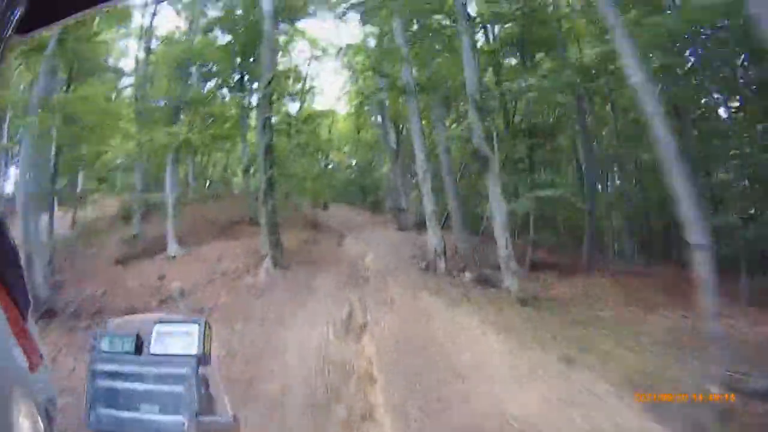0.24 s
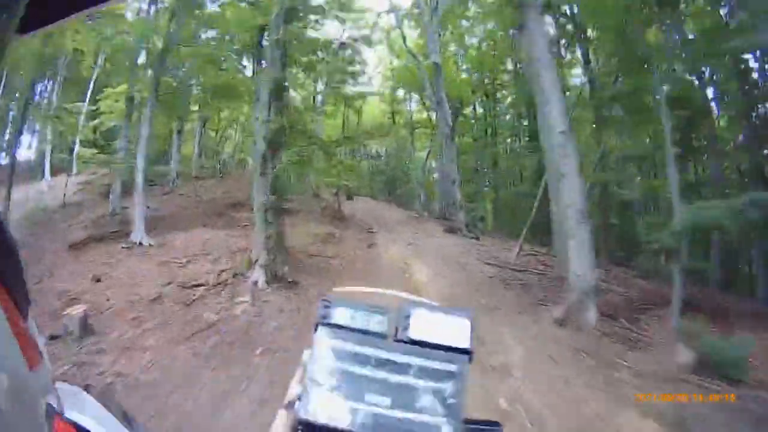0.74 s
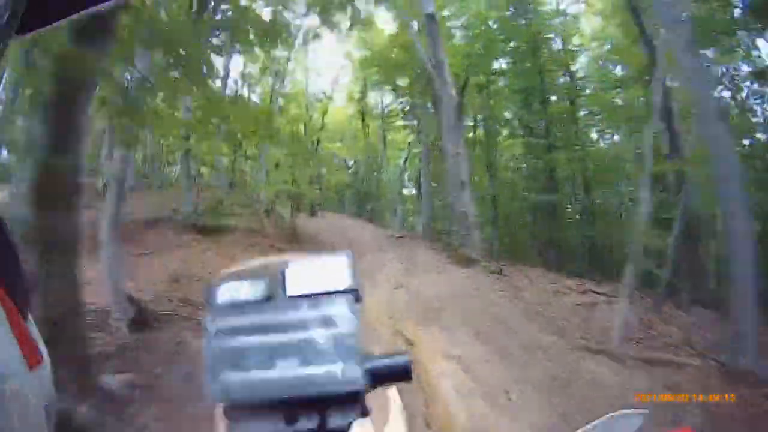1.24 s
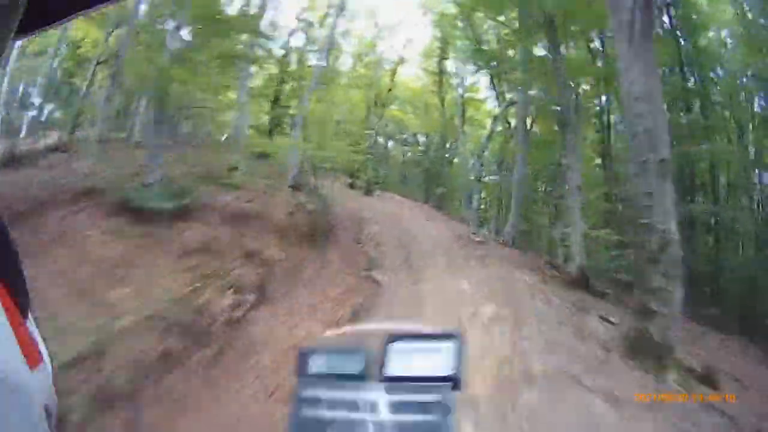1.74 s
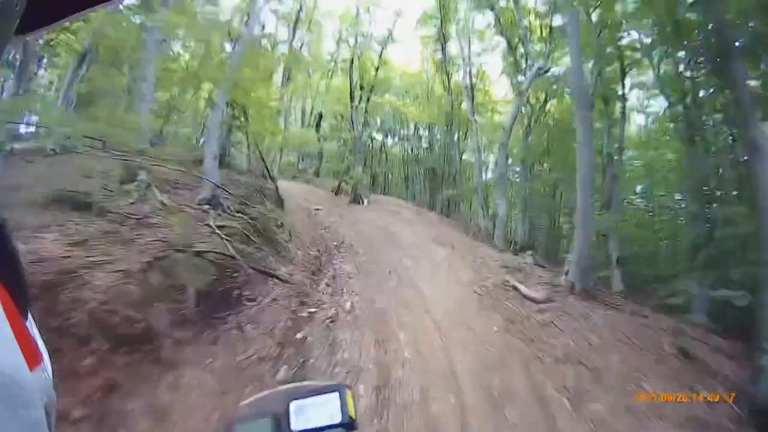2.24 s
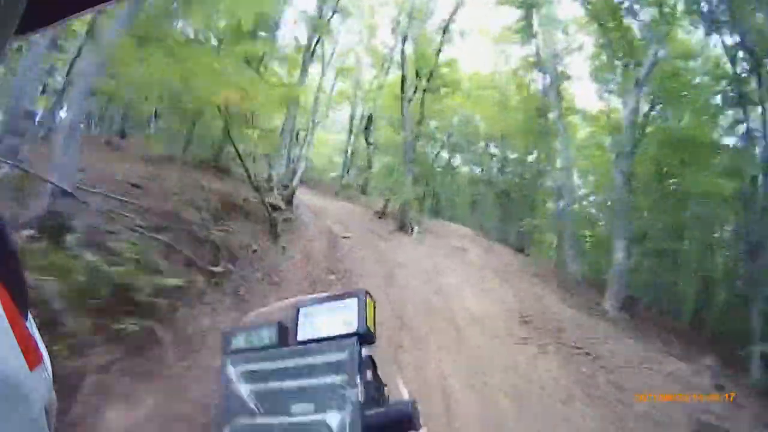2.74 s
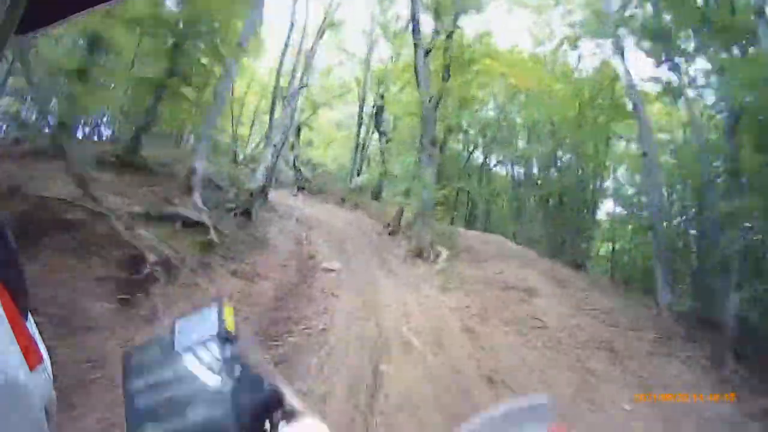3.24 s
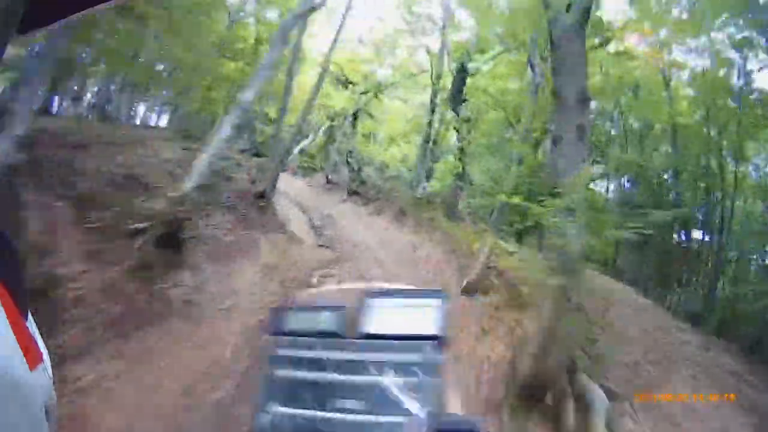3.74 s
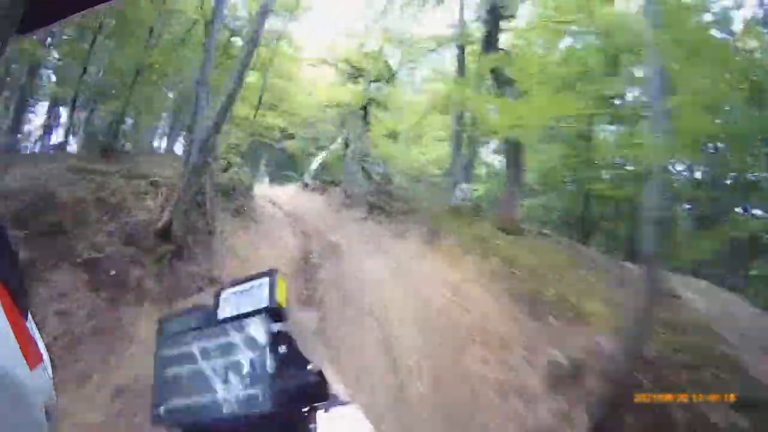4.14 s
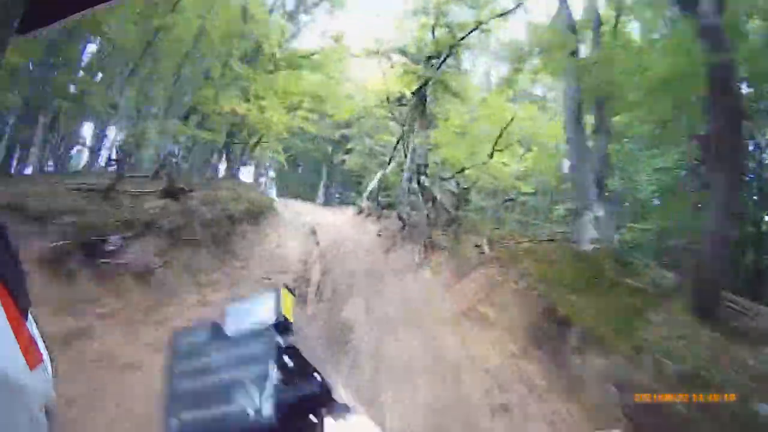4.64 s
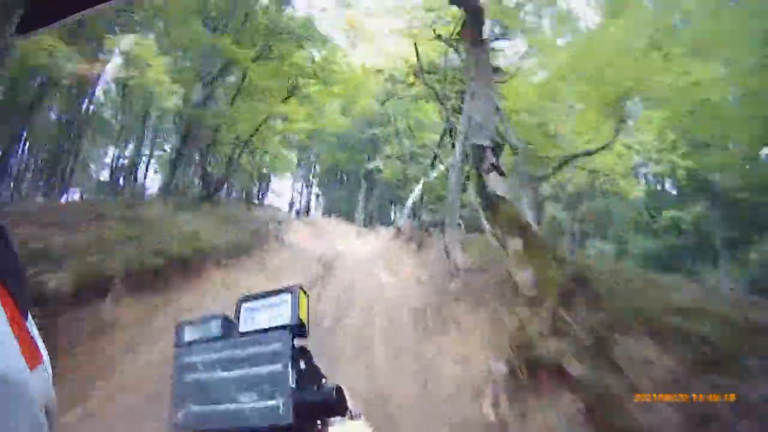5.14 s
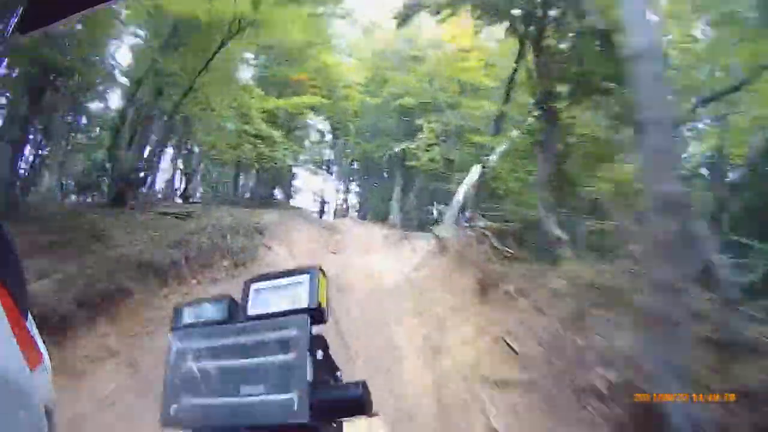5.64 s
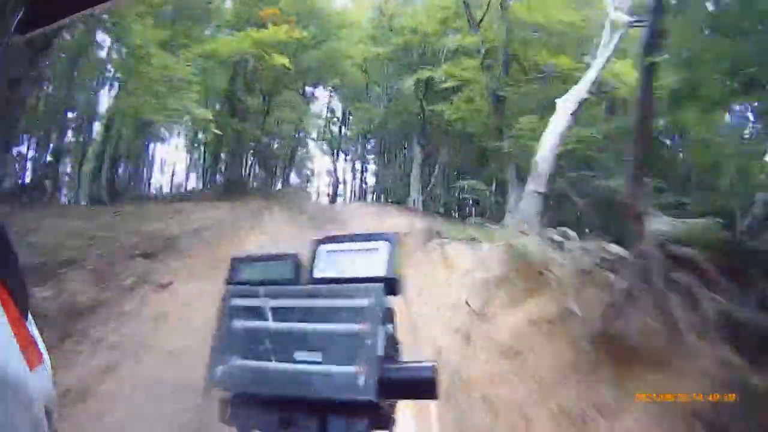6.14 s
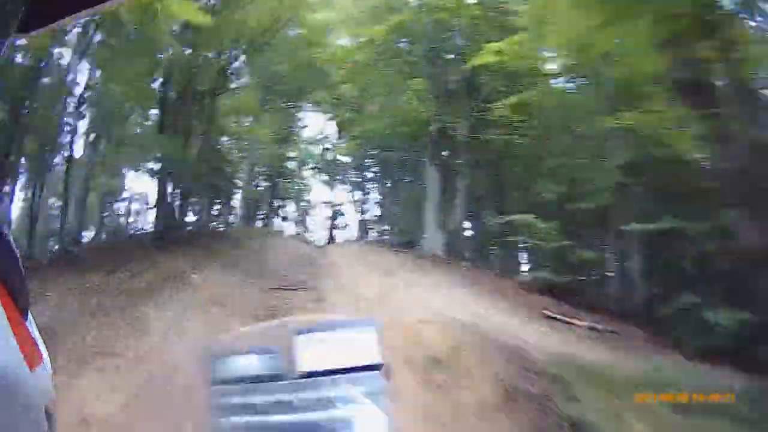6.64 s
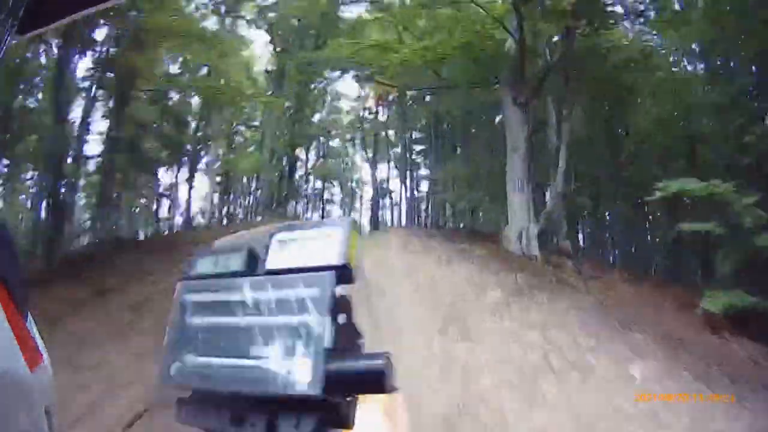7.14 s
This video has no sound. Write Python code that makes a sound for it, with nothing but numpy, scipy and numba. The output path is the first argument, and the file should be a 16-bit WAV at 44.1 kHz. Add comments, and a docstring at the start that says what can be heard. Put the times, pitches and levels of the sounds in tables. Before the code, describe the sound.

A single-cylinder dirt bike climbs a rough forest trail, heard close up from the rider's helmet. Its throbbing, wavering growl dominates throughout, with light engine clatter, faint tyre hiss and a low wind rumble beneath. The revs build over the first two seconds, then the throttle shuts and the engine turns much quieter. From about 2.8 seconds it pulls unevenly at lower revs, grows louder around 4.7 seconds and reaches its highest pitch near 6 seconds. It drops sharply at about 6.3 seconds, then picks up again from 6.5 seconds to the end. Short, dull knocks from bumps come at around 0.5, 3 and 3.8 seconds, and a few more between 6.4 and 7 seconds. Brief, light metallic rattles of chain and loose parts are scattered along the way, clearest near 1.5 and 5.6 seconds.

```python
"""Dirt bike on a forest trail

A four-stroke single climbs rough ground, heard close up from a microphone on the rider's helmet.
Each cycle gives an exhaust blow and, with the throttle open, an intake gulp; both ring pipe and airbox.
The engine case clatters, chain and tyres hiss, the brake disc brushes its pads, stones tick,
bumps rattle and jolt the bike, and air rumbles at the microphone."""
import sys
import numpy as np
from scipy import signal
from scipy.fft import rfft, irfft, next_fast_len
from scipy.io import wavfile
from scipy.ndimage import uniform_filter1d
from numba import njit

SR = 44100
rng = np.random.default_rng(int(sys.argv[2]) if len(sys.argv) > 2 else 0)


def dump(signal):
    """Clip the signal to [-1, 1] and save it as 16-bit WAV at the path in sys.argv[1]."""
    limited = np.clip(np.atleast_2d(signal).T, -1, 1)
    pcm = np.round(limited * 32767).astype(np.int16)
    wavfile.write(sys.argv[1], SR, pcm)


N = 326340
TIME = np.arange(N) / SR
CRUISE_HZ, CRUISE_DB = 38, -15  # firing rate and load at a steady pull

# engine speed: t/s, firing rate/Hz
SPEED = [(0.0, 32.77), (0.06, 33.02), (0.14, 34.61), (0.41, 34.67), (0.73, 37.07), (0.83, 36.4),
         (1.22, 41.86), (1.37, 39.5), (1.46, 40.57), (1.54, 43.89), (1.62, 40.79), (1.71, 40.04),
         (1.79, 40.91), (1.88, 41.69), (1.98, 42.72), (2.05, 33.76), (2.24, 37.19), (2.42, 36.05),
         (2.62, 35.81), (2.76, 33.5), (2.83, 34.3), (3.01, 38.31), (3.09, 37.82), (3.17, 38.95),
         (3.52, 34.14), (3.77, 33.47), (3.91, 35.02), (4.01, 35.48), (4.08, 33.79), (4.26, 36.24),
         (4.39, 34.76), (4.48, 34.83), (4.58, 36.38), (4.74, 34.93), (4.92, 35.86), (5.04, 38.99),
         (5.28, 37.89), (5.41, 35.12), (5.45, 36.15), (5.52, 39.04), (5.63, 38.76), (5.84, 44.53),
         (5.93, 44.96), (5.98, 48.16), (6.01, 48.39), (6.1, 48.79), (6.17, 48.18), (6.24, 43.52),
         (6.31, 37.13), (6.41, 33.93), (6.44, 36.13), (6.55, 37.53), (6.67, 35.59), (6.83, 41.27),
         (6.91, 40.56), (6.98, 42.65), (7.04, 41.57), (7.22, 41.84), (7.31, 44.55), (7.39, 44.58)]
# how hard the engine pulls: t/s, level/dB
LOAD = [(0.0, -16), (0.5, -18), (0.9, -13.5), (1.2, -13.5), (1.54, -13.5), (1.6, -14.5), (1.95, -13),
        (2.06, -27.5), (2.15, -32.5), (2.24, -23), (2.42, -25), (2.79, -23.5), (2.86, -17), (3.0, -19.5),
        (3.11, -21.5), (3.18, -17.5), (3.33, -18.5), (3.54, -25), (3.8, -21.5), (4.04, -17.5), (4.6, -17.5),
        (4.73, -12), (5.03, -13.5), (5.24, -14.5), (5.62, -13), (5.8, -9), (5.96, -9.5), (6.1, -12.5),
        (6.17, -10.5), (6.255, -10.5), (6.275, -21.5), (6.33, -20), (6.4, -26), (6.5, -16.5), (6.65, -20),
        (6.9, -13), (7.4, -10.5)]
# trims on top of load and speed: t/s, bark/dB, case clatter/dB, hiss/dB
TRIMS = [(0.0, 2.5, -0.5, 1), (0.8, 0, -0.5, 1.5), (1.0, 2, -2, 0), (1.6, 3, -0.5, 2.5),
         (1.7, 3.5, -3, 0.5), (2.1, 3.5, 1.5, 2.5), (2.2, 1.8, -0.5, -1.5), (3.2, 1, -2, -1),
         (3.3, 2, 3.5, 0.5), (3.5, 1, -1, 3), (3.7, 0, 0.4, -0.2), (4.2, 3, 2, 2), (4.9, -0.5, -0.5, 0),
         (5.0, 3.5, -0.5, 1.5), (5.4, 2.5, 1.5, 2.5), (5.5, 6, 0.1, 1.5), (5.6, 1, 1.5, 0.5),
         (6.2, 0.5, 2, 1.5), (6.3, 3.5, 0.5, 3), (6.8, 3, -2.5, 1), (6.9, 1.5, 0.1, 1.5), (7.4, 2, 1, 1)]
# colour of chain and loose parts: f/Hz, level/dB
RATTLE_COLOUR = [(600, -17), (1200, 20), (2500, 4), (4000, 1), (5500, -0.5), (7800, -6), (10000, -18.5),
                 (16000, -26.5)]


def undb(db):
    """Decibels to gain."""
    return 10 ** (np.asarray(db) / 20)


def curves(table):
    """The columns of a table, joined by straight lines in time."""
    s, *columns = np.transpose(table)
    return [np.interp(TIME, s, c) for c in columns]


def unit(x):
    """Scale to rms 1."""
    return x / np.sqrt(np.mean(x ** 2))


def steady(x):
    """Scale to rms 1 over a few engine cycles, keeping the single beats."""
    size = SR // 9
    return x / np.sqrt(uniform_filter1d(uniform_filter1d(x ** 2, size), size // 2) + 1e-18)


def noise():
    """White noise."""
    return rng.standard_normal(N)


def walk(rate):
    """Glide to a new random value every 1 / rate s; rms 1."""
    size = int(SR / rate)
    steps = np.repeat(rng.standard_normal(N // size + 1), size)
    return unit(uniform_filter1d(steps, size)[:N])


def ring(x, colour, sharp=1):
    """Pass x through a body's (Hz, dB) response; sharp 1 strikes and fades, -1 swells and stops."""
    size = next_fast_len(N + SR // 2, True) // 2 * 2
    hz, db = np.transpose(colour)
    freqs = np.arange(size // 2 + 1) * SR / size
    cepstrum = irfft(np.log(undb(np.interp(np.log(freqs + 1), np.log(hz), db))))
    cepstrum[1:size // 2] *= 1 + sharp
    cepstrum[size // 2 + 1:] *= 1 - sharp
    return irfft(rfft(x, size) * np.exp(rfft(cepstrum)))[:N]


@njit
def band(x, hz, width):
    """Band-pass whose centre may move every sample; gain 1 at the centre."""
    out, b, low = np.empty(len(x)), 0., 0.
    for i in range(len(x)):
        g, k = np.tan(np.pi * hz[i] / SR), width / hz[i]
        v = (b + g * (x[i] - low)) / (1 + g * (g + k))
        b, low, out[i] = 2 * v - b, low + 2 * g * v, k * v
    return out


def resonate(x, centres, width_hz, boost_db):
    """Lift a narrow resonance that moves along a (s, Hz) curve."""
    hz, = curves(centres)
    return x + (undb(boost_db) - 1) * band(x, hz, float(width_hz))


def clicks(times, sizes):
    """Impulses, each shared between two neighbouring samples."""
    place = np.clip(times * SR, 0, N)
    at, part = place.astype(int), place % 1
    return (np.bincount(at, sizes * (1 - part), N + 2) + np.bincount(at + 1, sizes * part, N + 2))[:N]


def puffs(pulses, decay_s):
    """A burst of turbulence after each pulse, with the same energy as the pulse."""
    keep = np.exp(-1 / (decay_s * SR))
    return signal.lfilter([np.sqrt(1 - keep ** 2)], [1, -keep], np.abs(pulses)) * noise()


def strokes(cycles, jitter_s, scatter_db):
    """One pulse per engine cycle, never quite alike; jitter and scatter may be curves."""
    times = np.interp(np.arange(np.ceil(cycles[0]), cycles[-1]), cycles, TIME)
    chance = rng.standard_normal((len(times), 2))
    jitter, scatter = (np.interp(times, TIME, c + np.zeros(N)) for c in (jitter_s, scatter_db))
    return clicks(times + jitter * chance[:, 0], undb(scatter * chance[:, 1]))


def crank(rate):
    """Engine cycles so far; now and then the beat shifts a few milliseconds, like an audio glitch."""
    # skips in the sound: t/s, delay of the beat/cycles
    skips = [(1.22, .2), (1.84, -.12), (4.28, .16), (5.69, -.13), (5.95, .12)]
    delay = sum(part * np.clip((TIME - s) / .025 + .5, 0, 1) for s, part in skips)
    return np.cumsum(rate) / SR - delay - .15


def pipe_boom(cycles):
    """Exhaust pushes and intake sucks; their spacing picks which harmonics stand out."""
    # throttle: t/s, intake gulp against exhaust blow/dB, its lag/cycles, unevenness/dB
    throttle = [(0, -5, .572, -17), (.45, -2, .575, -13.5), (1.15, -3.5, .572, -16),
                (1.55, -3.5, .575, -12), (1.9, -10.5, .57, -8), (2.2, -25, .57, -10), (2.7, -22, .57, -10),
                (3.0, -9.5, .66, -11), (3.25, -3, .65, -20), (3.5, -9.5, .62, -12), (3.8, -8, .6, -8.5),
                (4.05, -3.5, .56, -5.5), (4.5, -9.5, .56, -9), (4.8, -4.5, .563, -9.5),
                (5.05, -10, .575, -9.5), (5.2, -11, .59, -6.5), (5.38, -6.5, .565, -18.5),
                (5.6, -6.5, .59, -23.5), (5.85, -2.5, .59, -26.5), (6.08, -16, .55, -10),
                (6.3, -12.5, .576, -13), (6.55, -6, .63, -13.5), (6.85, -11, .6, -9.5),
                (7.1, -8.5, .59, -13), (7.4, -7, .56, -10.5)]
    # low response of pipe and airbox: f/Hz, level/dB
    colour = [(15, -74), (40, -47), (78, -20), (120, -25), (165, -17.5), (205, 1.5), (240, 3), (268, 4),
              (290, 3), (325, 0.5), (375, -15.5), (600, -90)]
    # its wandering resonance: t/s, f/Hz
    resonance = [(0, 299), (.8, 273), (1.6, 268), (2.0, 307), (2.25, 310), (2.7, 298), (2.9, 261),
                 (3.25, 276), (3.45, 308), (3.8, 298), (4.1, 268), (4.9, 279), (5.1, 245), (5.35, 266),
                 (5.55, 232), (6.05, 268), (6.5, 283), (7.0, 283), (7.4, 246)]
    intake_db, intake_lag, uneven_db = curves(throttle)
    # the throttle trembles over rough ground, so the growl wavers
    intake_db += 1.4 * walk(rate=11)
    intake_lag += .008 * walk(rate=14)
    # the blows vary in time and strength, following the unevenness curve
    uneven = undb(uneven_db)
    spread = dict(jitter_s=.0009 * uneven, scatter_db=4.5 * uneven)
    gas = strokes(cycles, **spread) - undb(intake_db) * strokes(cycles - intake_lag, **spread)
    boom = ring(gas + .75 * uneven * puffs(gas, decay_s=.008), colour, sharp=-.4)
    return resonate(boom, resonance, width_hz=108, boost_db=9.5)


def drone(boom, load_db, from_db=-18, full_db=-13):
    """Under load the pipe rings at its limit and the blows merge into a drone."""
    squeeze = np.interp(load_db, [from_db, full_db], [0, .45])
    swing = np.abs(signal.hilbert(steady(boom), next_fast_len(N)))[:N]
    size = SR // 200
    envelope = uniform_filter1d(uniform_filter1d(swing, size), size)
    return steady(boom / (envelope + .1) ** squeeze)


def valve_bark(cycles, exhaust_lag=.2084, intake_lag=.59):
    """Each valve adds a short, bright bark with a spit of turbulence and a longer wake."""
    # balance of the two barks: t/s, intake against exhaust/dB
    balance = [(0, -4), (.45, 11), (.62, -6.5), (1.0, -6), (1.95, 6.5), (2.3, -11), (2.75, 2), (2.85, -4),
               (3.3, -0.5), (3.55, -5.5), (3.95, -7), (5.6, -8), (6.0, -2.5), (6.4, -7.5), (7.4, -2)]
    # midrange response of the pipe: f/Hz, level/dB
    colour = [(230, -19.5), (340, 4), (420, 2.5), (490, -0.5), (550, -0.5), (620, -1.5), (680, -4.5),
              (750, -3.5), (880, -13), (1500, -59), (4000, -100)]
    # its wandering resonance: t/s, f/Hz
    resonance = [(0, 493), (.6, 480), (1.0, 456), (1.5, 486), (1.9, 482), (2.3, 527), (3.0, 513),
                 (4.0, 480), (4.35, 470), (4.8, 504), (5.25, 448), (5.5, 469), (5.9, 449), (6.6, 471),
                 (7.1, 488), (7.4, 495)]
    intake_db, = curves(balance)
    snaps = strokes(cycles - exhaust_lag, jitter_s=.00006, scatter_db=1.2)
    snaps += undb(intake_db) * strokes(cycles - intake_lag, jitter_s=.00006, scatter_db=1.2)
    spit, wake = .2 * puffs(snaps, decay_s=.003), .53 * puffs(snaps, decay_s=.04)
    bark = ring(snaps + spit + wake, colour, sharp=-.05)
    return steady(resonate(bark, resonance, width_hz=60, boost_db=8))


def piston_slaps(cycles):
    """Piston and valves slap twice a cycle, the second blow less regular."""
    first = strokes(cycles - .1, jitter_s=.0003, scatter_db=-.5)
    return first + .93 * strokes(cycles - .75, jitter_s=.00055, scatter_db=3.5)


def case_clatter(slaps):
    """The engine case rings under the slaps."""
    # response of the case: f/Hz, level/dB
    colour = [(500, -28), (880, -4), (1030, -0.5), (1170, -5), (1300, -3), (1480, -8.5), (1750, -10.5),
              (2100, -34), (4000, -62)]
    # its wandering resonance: t/s, f/Hz
    resonance = [(0, 1104), (1.2, 1160), (1.6, 1140), (2.1, 1190), (2.699, 1133), (3.3, 1210), (3.65, 1140),
                 (3.95, 1130), (4.3, 1090), (4.9, 1100), (5.15, 1210), (5.4, 1105), (5.8, 1147),
                 (6.3, 1170), (7.4, 1120)]
    clatter = ring(.4 * slaps + puffs(slaps, decay_s=.014), colour, sharp=.2)
    return steady(resonate(clatter, resonance, width_hz=95, boost_db=9))


def tyre_hiss(slaps):
    """Tyres and grit give a grainy hiss that the engine's blows ride on."""
    # colour of the hiss: f/Hz, level/dB
    colour = [(1000, -4.5), (1800, 0), (2250, 1), (2800, -7), (3550, -9.5), (3730, -6), (3900, -9),
              (4500, -13.5), (5400, -16.5), (7000, -22.5), (9000, -28), (11000, -28.5), (13000, -30.5),
              (16000, -33.5)]
    grit = unit(noise() * undb(2 * np.minimum(rng.exponential(size=N), 5)))
    return steady(ring(grit + .57 * unit(puffs(slaps, decay_s=.01)), colour))


def chain_jingle():
    """The slack chain jingles in fits."""
    return undb(-51 + 2 * walk(rate=25)) * unit(ring(noise(), RATTLE_COLOUR))


def crank_hum(cycles, speed):
    """The unbalanced crank hums at twice the firing rate, more as it speeds up."""
    return undb(-29 + .73 * walk(rate=6)) * speed ** 3.6 * np.sin(4 * np.pi * cycles)


def engine():
    """Engine, chain and tyres all swell with load; clatter, hiss and hum also with speed."""
    (rate,), (load_db,) = curves(SPEED), curves(LOAD)
    bark_db, case_db, hiss_db = curves(TRIMS)
    cycles, speed = crank(rate), rate / CRUISE_HZ
    pull_db, speed_db = load_db - CRUISE_DB, 20 * np.log10(speed)
    boom = undb(.82) * drone(pipe_boom(cycles), load_db)
    bark = undb(-22 + .53 * pull_db + bark_db) * valve_bark(cycles)
    slaps = piston_slaps(cycles)
    clatter = undb(-30 + .31 * pull_db + .55 * speed_db + case_db) * case_clatter(slaps)
    hiss = undb(-41 + .34 * pull_db + speed_db + hiss_db) * tyre_hiss(slaps)
    return undb(load_db) * (boom + chain_jingle() + crank_hum(cycles, speed)) + bark + clatter + hiss


def wind(gust_db=1.5):
    """Air buffets the helmet, right at the microphone."""
    # strength of the wind: t/s, level/dB
    gusts = [(0, -29.5), (1.0, -33), (1.5, -29.5), (2.05, -30.5), (2.15, -31), (2.5, -35.5), (2.65, -28),
             (3.3, -33), (3.8, -30.5), (4.6, -32), (5.5, -29.5), (6.3, -34.5), (6.5, -27.5), (7.4, -37)]
    # colour of the rumble: f/Hz, level/dB
    colour = [(20, -35.5), (45, -1), (72, 5.5), (110, 9), (165, 13), (230, 14), (600, -34.5), (2000, -80)]
    level_db, = curves(gusts)
    return undb(level_db + gust_db * walk(rate=7.4)) * unit(ring(noise(), colour))


def brake(brush_db=-66.5, graze_db=-54, graze_s=4.48, width_s=.22, whine_hz=3700, rise_hz_per_s=260):
    """The disc rings faintly as it brushes its pads; one harder graze gives a thin, rising whine."""
    # ring of the disc: f/Hz, level/dB
    disc = [(3300, -51.5), (3650, -11), (3730, -12), (3810, -15.5), (4200, -53)]
    brush = undb(brush_db + 2 * walk(rate=41)) * unit(ring(noise(), disc))
    hz = whine_hz + rise_hz_per_s * np.clip(TIME - graze_s, -1, 1) + 14 * walk(rate=120)
    contact = undb(graze_db + 2 * walk(rate=30)) * np.exp(-((TIME - graze_s) / width_s) ** 2)
    return brush + contact * np.sin(2 * np.pi * np.cumsum(hz) / SR)


def stones(level_db=-56.5, spread_db=5, count=110):
    """Small stones and chain links tick against the frame all along the trail."""
    # colour of a tick: f/Hz, level/dB
    colour = [(800, -18), (2200, 5), (5500, -4.5), (8000, -11.5), (16000, -24)]
    when, size = rng.random((count, 2)).T
    hits = clicks(when * N / SR, undb(-spread_db * np.log(size + .05)))
    return undb(level_db) * unit(ring(puffs(hits, decay_s=.005), colour))


def rattles(gain_db=3.5, bounce_s=.0086, t60_s=.043, count=7):
    """Each bump throws chain and loose parts against the frame; they bounce, chink and die away."""
    # bumps in the trail: t/s, strength/dB, chink against rattle/dB
    bumps = [(0.109, -43, -21), (0.372, -48, -16), (0.483, -43.5, -19), (0.532, -46, -12), (1.009, -49, -5),
             (1.473, -41, -19), (1.536, -43.5, -13), (1.847, -42, -12), (2.378, -46, -17),
             (3.299, -47, -17), (3.408, -47, -14), (3.957, -41.5, -20), (4.690, -44.5, -8.5),
             (5.139, -45, -5), (5.168, -44, -15), (5.490, -39, -11), (5.677, -36.5, -20), (6.244, -55, -2),
             (6.665, -42, -18), (6.739, -46.5, -13)]
    # bright chink of metal on metal: f/Hz, level/dB
    chink_colour = [(3000, -25.5), (8000, 5), (11000, -5), (16000, -4.5)]
    envelopes = np.zeros((2, N))
    age = TIME[:SR // 4]
    for (s, db, chink_db), chance in zip(bumps, rng.random((len(bumps), count))):
        starts = np.r_[0, np.cumsum(bounce_s * (.3 + chance[1:]))]
        blows = sum(.5 ** k * (age >= start) * undb(-60 * np.abs(age - start) / t60_s)
                    for k, start in enumerate(starts))
        at = int(s * SR)
        envelopes[:, at:at + len(age)] += np.outer(undb([db, db + chink_db]), blows[:N - at])
    rattle, chink = envelopes
    return undb(gain_db) * (ring(rattle * noise(), RATTLE_COLOUR) + ring(chink * noise(), chink_colour))


def thuds(gain_db=4.5, body_hz=137, attack_s=.0032, t60_s=.11):
    """Roots and ruts jolt the bike: a short, dull knock from tyre and frame."""
    # jolts through the suspension: t/s, strength/dB
    jolts = [(0.543, -23), (2.576, -31), (3.012, -24), (3.579, -32), (3.776, -22.5), (4.127, -28),
             (5.511, -36), (6.42, -25), (6.702, -21), (6.938, -26)]
    out = np.zeros(N)
    for (s, db), detune in zip(jolts, rng.standard_normal(len(jolts))):
        age = np.maximum(TIME - s, 0)
        envelope = undb(db - 60 * age / t60_s) * (1 - np.exp(-age / attack_s))
        out += envelope * np.sin(2 * np.pi * body_hz * (1 + .04 * detune) * age)
    return undb(gain_db) * out


def scene():
    """Bike, trail and wind as they reach the helmet, in mono."""
    return (thuds() + rattles() + engine() + stones() + brake() + wind())[None]


def record(dry, ceiling=.95, top_hz=15750):
    """The helmet camera rounds the highest peaks and cuts the top."""
    rounded = dry / (1 + np.abs(dry / ceiling) ** 6) ** (1 / 6)
    return signal.sosfiltfilt(signal.ellip(10, .1, 60, top_hz, fs=SR, output="sos"), rounded)


dry = scene()
out = record(dry)
dump(out)
```